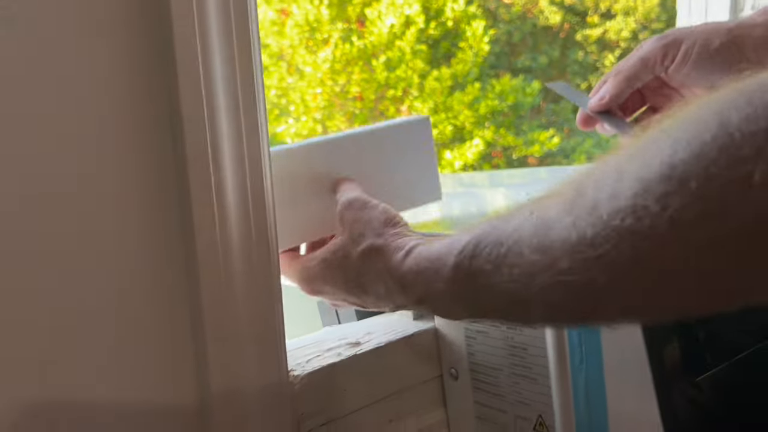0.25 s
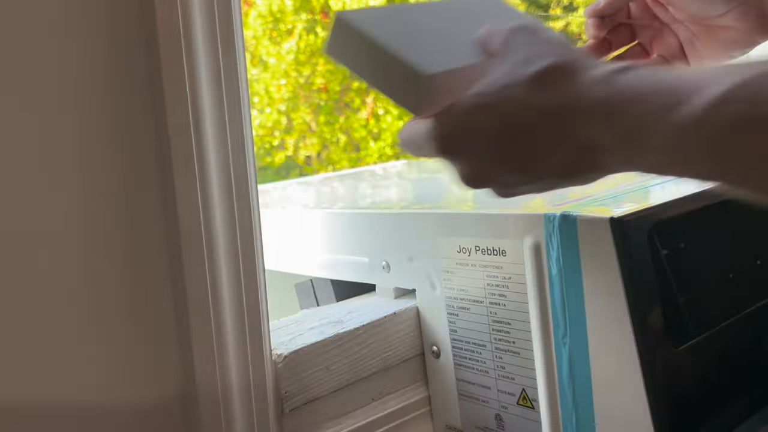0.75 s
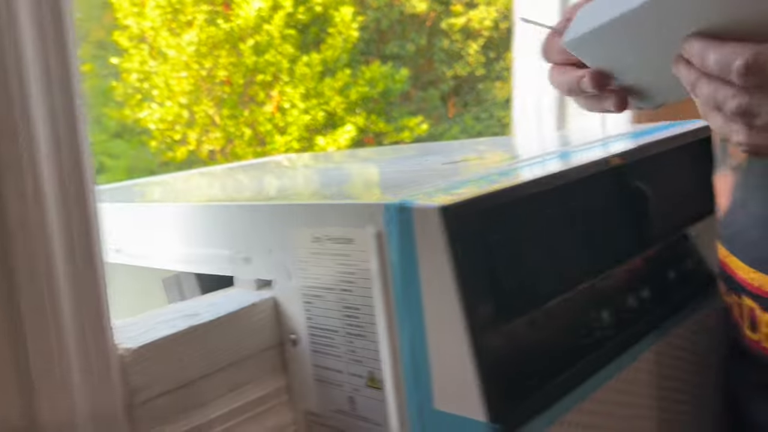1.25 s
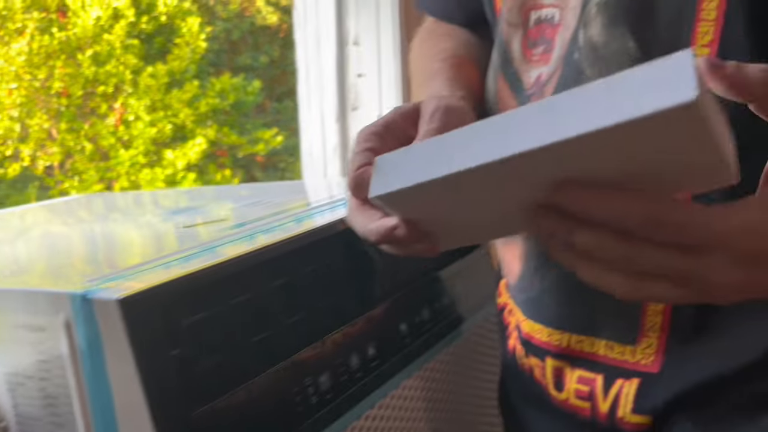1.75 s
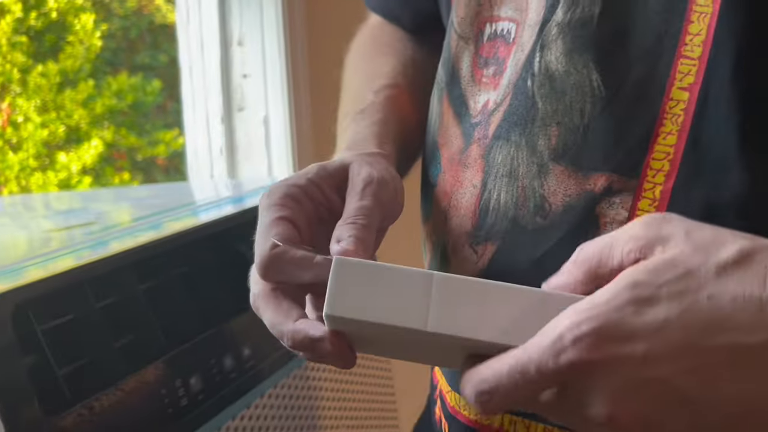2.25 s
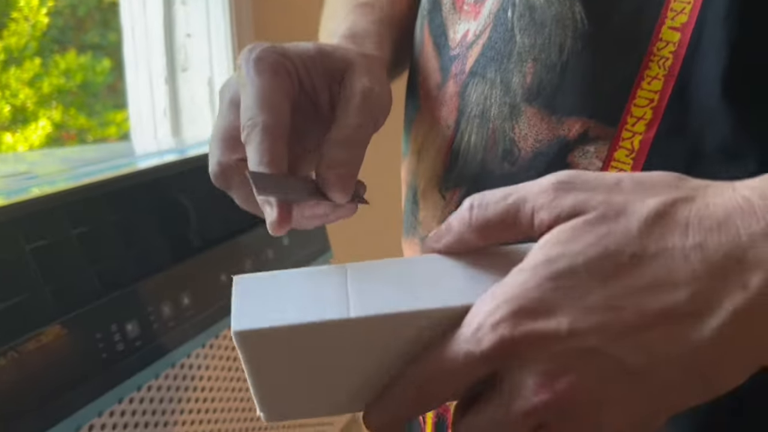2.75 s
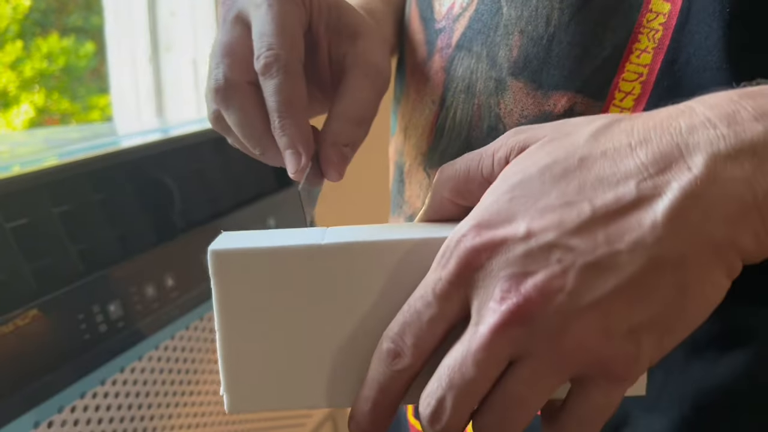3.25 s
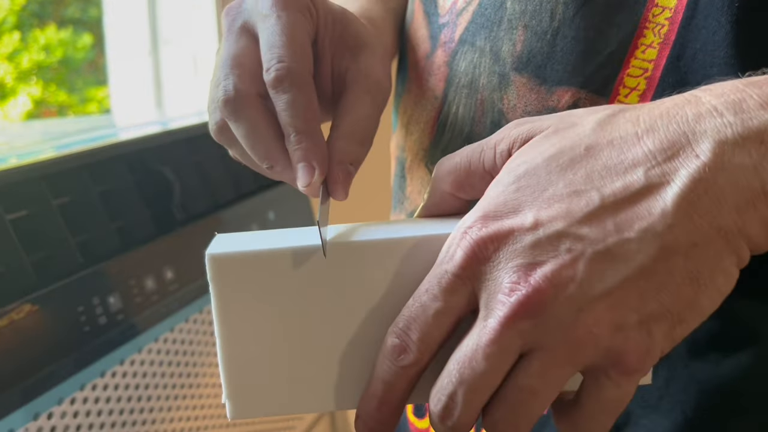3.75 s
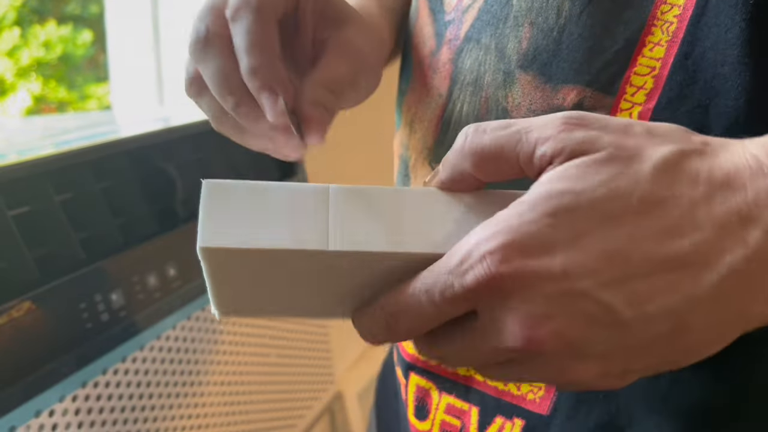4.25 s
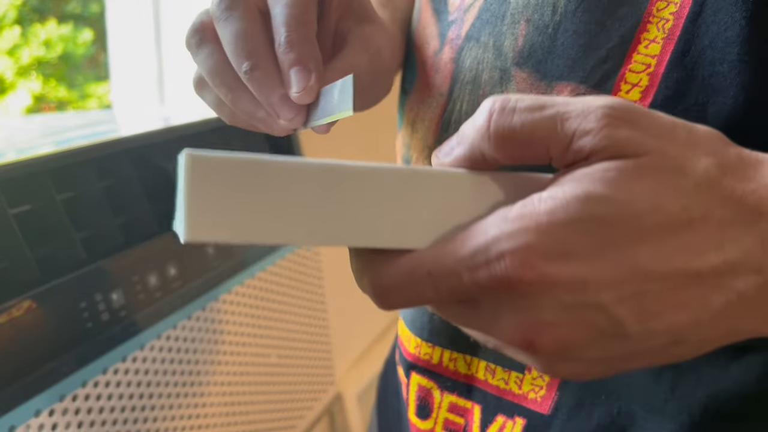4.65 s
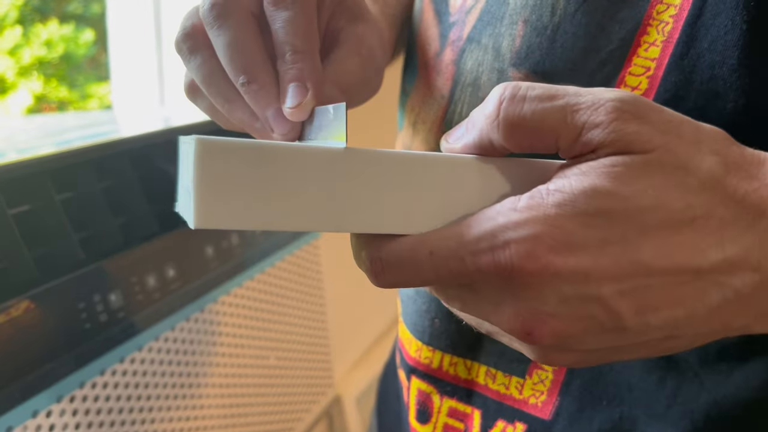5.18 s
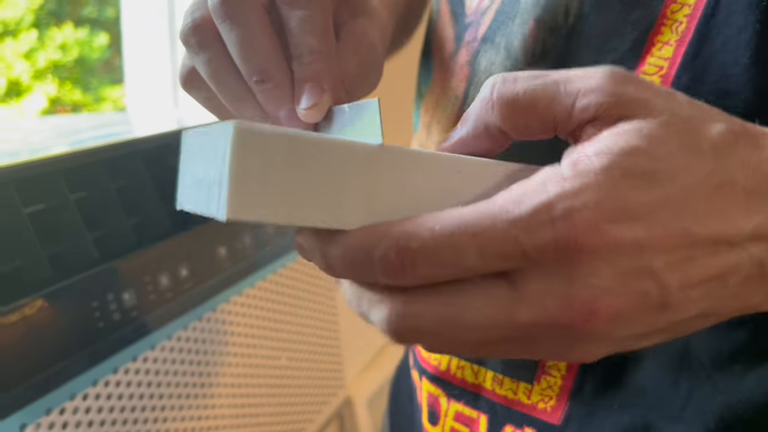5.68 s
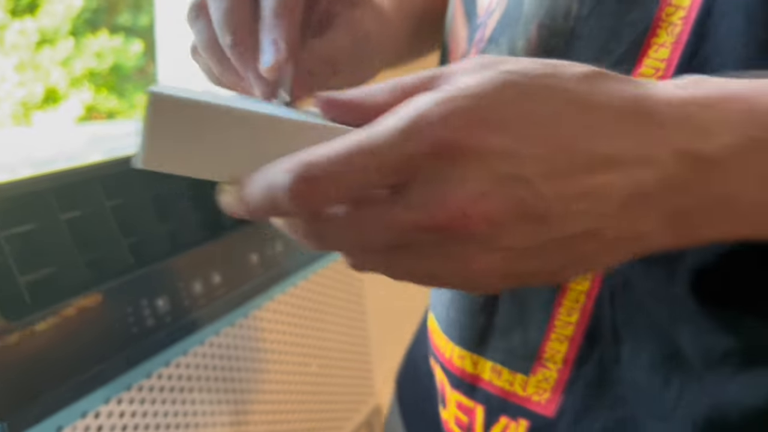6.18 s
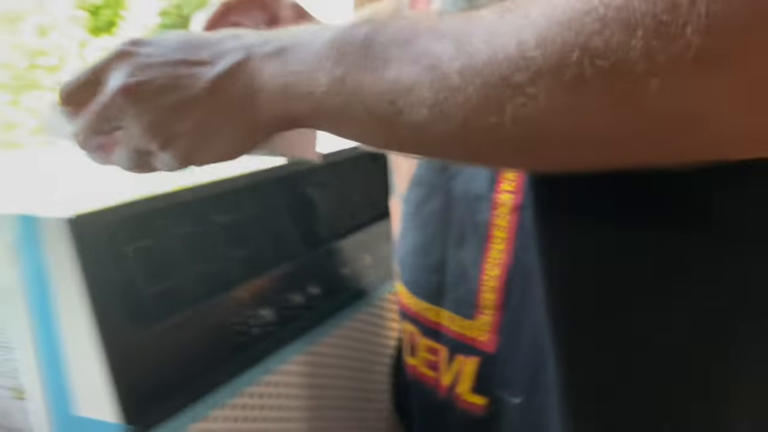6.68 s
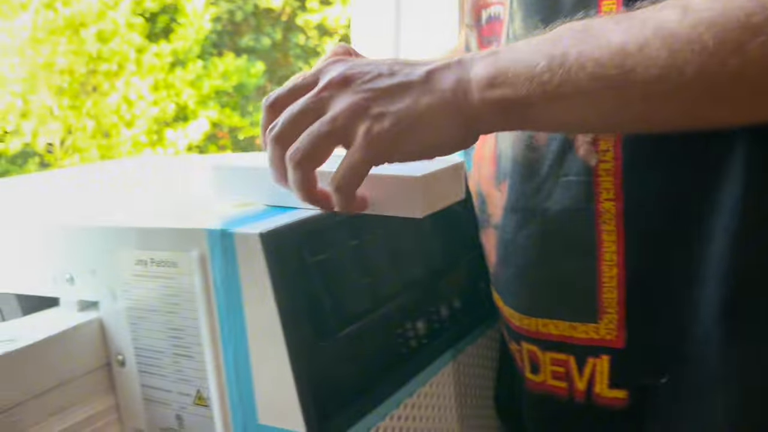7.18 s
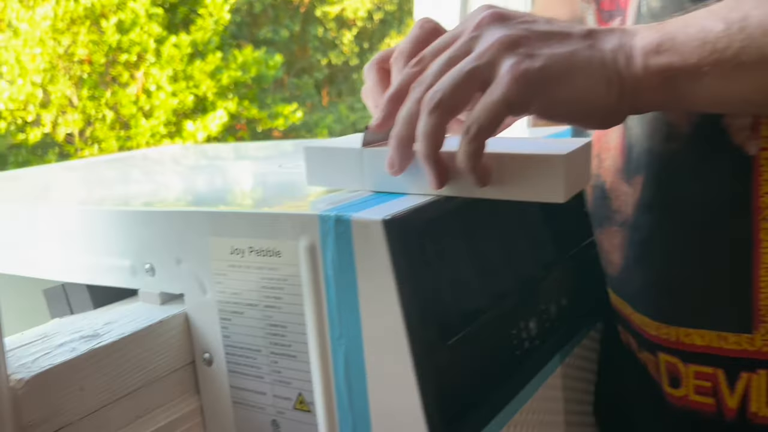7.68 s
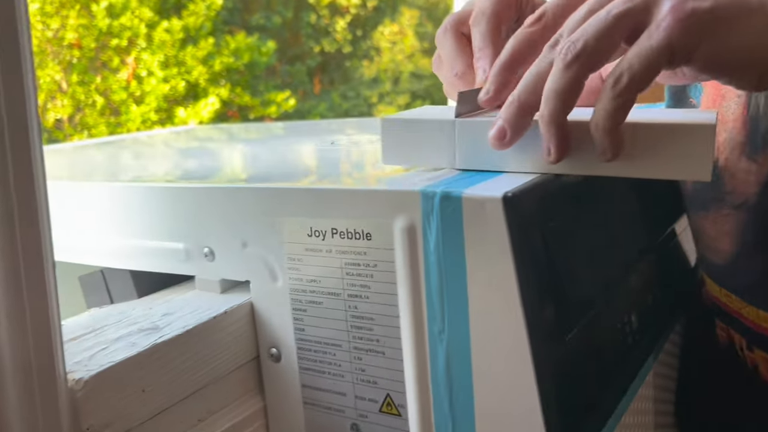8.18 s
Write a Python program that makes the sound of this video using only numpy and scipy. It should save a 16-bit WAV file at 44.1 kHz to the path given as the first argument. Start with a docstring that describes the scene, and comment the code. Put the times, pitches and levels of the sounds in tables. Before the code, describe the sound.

Stiff foam block rubbed and tapped in hands, knocked down onto a sheet-metal cabinet, then a blade ticks and squeaks over traffic and motor hum.

```python
"""Stiff foam block by an open window

Hands turn and rub a block of stiff foam, set it down on a sheet-metal cabinet and cut at it with a thin blade.
Rubbing is gritty shaped noise; taps and landings ring tuned modes under noisy cracks; the blade ticks and squeaks.
Traffic noise, a motor's wavering hum and faint whines lie behind, as a close two-port microphone hears them.
Levels in dB are mixing levels, set ahead of the peak rounding in record()."""
import sys
import numpy as np
from scipy import signal
from scipy.fft import rfft, irfft, next_fast_len
from scipy.io import wavfile

SR = 44100
rng = np.random.default_rng(int(sys.argv[2]) if len(sys.argv) > 2 else 0)


def transcribe(u):
    """Save the signal u as a 16-bit wav file named by the first command-line argument.

    u: samples, shape (n,) or (channels, n), limited to [-1, 1]; the rate is SR.
    q: integer samples, one column per channel.
    """
    v = np.clip(np.atleast_2d(u).T, -1, 1)
    q = np.round(v * 32767).astype(np.int16)
    wavfile.write(sys.argv[1], SR, q)


N = 371763


def from_db(db):
    """Decibels to gain."""
    return 10 ** (np.asarray(db) / 20)


def rms_one(x):
    """Scale to unit rms."""
    return x / np.sqrt(np.mean(x ** 2) + 1e-20)


def in_time(rows):
    """Columns of a curve table, one value per sample."""
    s, *columns = np.transpose(rows)
    return [np.interp(np.arange(N) / SR, s, column) for column in columns]


def drift(rate):
    """Slow random curve of spread 1, changing about rate times a second."""
    step = 40   # the curve is drawn once every 40 samples, then joined up
    r = np.exp(-2 * np.pi * rate * step / SR)
    white = rng.standard_normal(N // step + 2002)
    slow = signal.lfilter([1], [1, -2 * r, r * r], white)[2000:]
    return np.interp(np.arange(N) / step, np.arange(len(slow)), rms_one(slow))


def coloured(source, spectrum, turn=1):
    """Give a noisy source a spectrum, and a phase turn if asked; rms 1."""
    size = next_fast_len(N)
    hz = np.arange(size // 2 + 1) * SR / size + 1e-3
    point_hz, point_db = np.transpose(spectrum)
    gain = from_db(np.interp(np.log(hz), np.log(point_hz), point_db))
    return rms_one(irfft(rfft(source, size) * gain * turn, size)[:N])


def gritty(grit_db, rate):
    """White noise whose strength flickers at random."""
    return rng.standard_normal(N) * from_db(grit_db * drift(rate))


def ring(clicks, hz, t60):
    """A damped resonator: a unit click sets a sine of height 1 ringing."""
    r, w = from_db(-60 / (t60 * SR)), 2 * np.pi * hz / SR
    return signal.lfilter([0, np.sin(w)], [1, -2 * r * np.cos(w), r * r], clicks + 1e-18)


def tone(hz, db):
    """A sine of the given rms level on a moving pitch."""
    phase = 2 * np.pi * (np.cumsum(hz) / SR + rng.random())
    return np.sqrt(2) * from_db(db) * np.sin(phase)


def ports(source, other, mid, side, side_db, diffuse):
    """Two spaced ports: their difference is a quarter turn off their sum, plus a diffuse share."""
    diffuse = np.clip(diffuse, 0, 1)
    mixed = np.sqrt(1 - diffuse) * source + np.sqrt(diffuse) * other
    apart = coloured(mixed, side, turn=1j)
    return coloured(source, mid) + from_db(side_db) * apart * [[1], [-1]]


# Gain curve of the rubbing above 10 kHz. Each row: time in seconds, gain in dB.
TOP_GAIN = [(0, 1), (.4, -2), (.9, 1.5), (1.2, -1.5), (1.5, 0.5), (1.8, -1), (2.1, -1), (2.27, -3.5),
            (2.38, 0.5), (2.45, -2), (2.7, 2), (3.2, -1.5), (3.7, -4), (4.15, -1.5), (4.4, -4), (5.0, -3.5),
            (5.27, -3), (5.48, 3), (5.58, 2.5), (5.66, -2), (5.77, 0), (5.93, 0.5), (6.2, -2.5),
            (6.75, -0.5), (7.1, -2), (7.7, -3), (8.12, -3), (8.43, -2)]
# Edges in Hz of the neighbouring bands that brighten and dull separately.
PATCH_EDGES = [900, 1900, 2600, 3400, 4400, 5800, 7800, 10000, 16500]
PATCHES_PER_S = 14


def patchy(x, patchy_db):
    """Each band brightens and dulls on its own, as the contact shifts."""
    top_db, = in_time(TOP_GAIN)
    out = 0
    for low, high in zip(PATCH_EDGES, PATCH_EDGES[1:]):
        band = signal.sosfilt(signal.butter(2, [low, high], "band", fs=SR, output="sos"), x)
        gain_db = patchy_db * drift(PATCHES_PER_S) + top_db * (low >= 10000)
        out = out + from_db(gain_db) * band
    return out


# Strokes of skin or blade on foam. Each row: start in seconds, length in seconds, hiss level in dB,
# firmer scrape level in dB, scrape colour in Hz.
STROKES = [(0.247, 0.04, -67, -52, 2600), (0.349, 0.11, -49.5, -46.5, 2580), (0.466, 0.075, -53, -63, 2650),
           (0.581, 0.035, -61, -67, 2500), (0.924, 0.041, -57, -70, 2300), (1.07, .10, -56, -69, 2300),
           (1.183, 0.1, -45, -56, 1980), (1.343, 0.059, -45, -55, 1900), (1.46, 0.11, -51, -52.5, 1695),
           (1.598, 0.049, -47.5, -53, 1760), (1.686, 0.028, -50.5, -54, 1774),
           (1.746, .14, -47, -54.5, 1750), (1.953, 0.08, -48.5, -58, 4000), (2.06, 0.18, -55, -60, 1750),
           (2.244, 0.064, -43.5, -47, 3640), (2.336, 0.065, -43.5, -50, 3640),
           (2.432, 0.021, -47.5, -49, 3770), (2.562, 0.26, -54, -53.5, 2850), (2.97, 0.032, -62, -61, 2300),
           (4.098, 0.12, -52.5, -56, 3400), (4.272, 0.2, -51.5, -50, 3000), (5.21, 0.093, -49, -59, 4016),
           (5.332, 0.05, -49, -53, 3326), (5.447, .01, -44, -54, 2997), (5.462, 0.023, -34.5, -39.5, 3000),
           (5.492, 0.022, -35.5, -43.5, 2262), (5.568, 0.036, -37, -41.5, 2480),
           (5.612, 0.029, -38.5, -57, 4020), (5.658, 0.031, -39, -52, 3000),
           (5.699, 0.029, -40.5, -51, 2300), (5.75, 0.042, -45.5, -70, 2400), (5.86, 0.032, -55, -68, 2300),
           (5.898, 0.067, -50.5, -82, 2303), (6.167, 0.13, -49, -60, 2404), (6.727, 0.038, -41, -57, 2396),
           (7.091, 0.037, -47, -54, 2410), (8.103, 0.033, -48, -57, 4293), (8.199, 0.088, -58, -57, 4100)]
# Faint rustle between the strokes. Each row: time in seconds, hiss level in dB, scrape level in dB.
RUSTLE = [(0.0, -73, -51), (.3, -59, -59.5), (.85, -62, -52.5), (1.2, -52.5, -56), (2.5, -60.5, -56),
          (2.9, -73, -59), (3.3, -65, -56), (4.05, -56, -53.5), (4.6, -56, -49.5), (5.15, -58.5, -53),
          (6.1, -56.5, -49), (6.65, -57, -47), (6.9, -58.5, -53), (7.45, -59, -50), (8.0, -58, -53.5),
          (8.43, -53.5, -49)]
RISE_DB_PER_S, FALL_DB_PER_S = 796, 703   # how fast a stroke comes and goes
COLOUR_WIDTH, COLOUR_DB = 0.23, 8   # scrape resonance: width as a share of its pitch, level mixed in


def strokes(hiss, scrape):
    """Each stroke swells, holds and fades over the rustle, its scrape coloured by its own resonance."""
    t = np.arange(N) / SR
    hiss_db, scrape_db = in_time(RUSTLE)
    hiss_power = from_db(hiss_db) ** 2
    scraped = from_db(scrape_db) * scrape
    for start, length, stroke_hiss_db, stroke_scrape_db, hz in STROKES:
        near = slice(max(int((start - .15) * SR), 0), int((start + length + .15) * SR))
        before, after = np.maximum(start - t[near], 0), np.maximum(t[near] - start - length, 0)
        gain = from_db(-RISE_DB_PER_S * before - FALL_DB_PER_S * after)
        hiss_power[near] += (from_db(stroke_hiss_db) * gain) ** 2
        peak = signal.lfilter(*signal.iirpeak(hz, 1 / COLOUR_WIDTH, SR), scrape[:, near])
        tinted = rms_one(scrape[:, near] + from_db(COLOUR_DB) * peak)
        scraped[:, near] += from_db(stroke_scrape_db) * gain * tinted
    return np.sqrt(hiss_power) * hiss + scraped


# Treble hiss, sum of the ports, then their difference. Each row: frequency in Hz, relative density in dB.
HISS = [(2060, -38), (3500, 2.5), (4840, 3), (5660, 2), (6960, 3.5), (7700, 6), (9050, -8.5), (9580, -80),
        (9880, -48), (10100, -39), (10700, -6.5), (11700, -2), (13200, -5.5), (14700, -2.5), (15500, -12),
        (15800, -29)]
HISS_SIDE = [(2060, -36), (3500, -5), (6030, -1), (6750, -22), (6960, -84), (7320, -18), (7890, -12),
             (10000, 4.5), (11200, -6), (11900, -12), (12800, -21), (14000, -5), (15600, -21)]
# Firmer scrape, both sum and difference. Each row: frequency in Hz, relative density in dB.
SCRAPE = [(800, -30), (1550, -1.5), (2300, 4), (3200, 1.5), (4500, -2), (6500, -15), (9000, -57)]


def rubbing():
    """Light strokes hiss in the treble, firm ones add a lower scrape; both share the same grit."""
    grit = from_db(1.0 * drift(60))
    pressure = from_db(1.42 * drift(9.0))
    hiss = ports(gritty(0.33, 200), gritty(1.5, 200), HISS, HISS_SIDE, side_db=-2.5, diffuse=.3)
    scrape = ports(gritty(0.25, 100), gritty(1.5, 100), SCRAPE, SCRAPE, side_db=-8.5, diffuse=.3)
    hiss = rms_one(patchy(hiss, patchy_db=0.7))
    scrape = rms_one(patchy(scrape, patchy_db=1.23))
    return grit * pressure * strokes(hiss, scrape)


# The blade catches. Each row: time in seconds, relative peak level in dB, ring pitch in Hz.
TICKS = [(7.958, -38, 2820), (7.97, -33, 5930), (7.985, -41, 5300), (8.086, -48, 6000), (8.104, -39, 5260),
         (8.112, -45, 7400), (8.126, -45, 3800), (8.153, -41, 4100), (8.185, -46, 3900), (8.230, -38, 4100),
         (8.240, -50, 6000), (8.272, -46, 4000), (8.38, -49, 4200), (8.409, -40, 3717)]
TICK_S, TICK_T60_S = 0.0057, 0.013   # the scratch falls to 1/e in this time; the blade's ring to -60 dB


def ticks():
    """The thin blade catches on the foam: a dry scratch coloured by a short ring."""
    out, t = np.zeros(N), np.arange(1500) / SR
    for s, db, hz in TICKS:
        scratch = ring(rng.standard_normal(1500) * np.exp(-t / TICK_S), hz, TICK_T60_S)
        scratch = scratch / np.abs(scratch).max()
        at = int(s * SR)
        out[at:at + 1500] += from_db(db - 1.5) * scratch[:N - at]
    return out * from_db([[1.0], [-1.0]])   # a little to the left


# Blade squeak. Each row: time in seconds, level in dB, pitch in Hz.
SQUEAK = [(7.55, -70, 2743), (7.7, -60, 2746), (7.93, -58.5, 2720), (8.0, -51, 2596), (8.06, -60, 2560),
          (8.09, -50, 2550), (8.2, -52, 2577), (8.24, -47, 2550), (8.29, -47, 2530), (8.34, -53.5, 2556),
          (8.41, -47, 2518), (8.43, -51, 2520)]
SLIPS_PER_S, SLIP_DEPTH_DB, SQUEAK_WAVER_HZ = 120, 4, 129.9


def squeak():
    """The blade drags through the foam: a wavering high tone that throbs with each slip."""
    db, hz = in_time(SQUEAK)
    slip_rate = SLIPS_PER_S * (1 + 0.348 * drift(24))
    slips = np.sin(2 * np.pi * np.cumsum(slip_rate) / SR)
    hz = hz + SQUEAK_WAVER_HZ * drift(151.6)
    db = db + SLIP_DEPTH_DB * slips + 2.7 * drift(40)
    started = np.arange(N) > SQUEAK[0][0] * SR
    return tone(hz, db) * started


def dying_noise(at, db, spectrum, decay_s):
    """Coloured noise that starts at once at each blow and falls to 1/e in decay_s."""
    clicks = np.zeros(N)
    clicks[at] = from_db(db)
    dying = signal.lfilter([1], [1, -np.exp(-1 / (decay_s * SR))], clicks + 1e-18)
    return dying * coloured(rng.standard_normal(N), spectrum)


# Bright crack, then rough tail of a blow. Each row: frequency in Hz, relative density in dB.
CRACK = [(700, 0.5), (1500, 3.5), (2500, -2), (3800, -2), (5000, -7), (8000, -10), (9300, -23),
         (10100, -47), (11000, -19), (12500, -17.5), (15000, -18)]
TAIL = [(120, -37), (250, 10.5), (500, 1), (800, 0), (1500, -8.5), (3000, -22.5), (6000, -29), (9000, -54)]
CRACK_SPLIT_HZ = 2950   # the crack's treble is levelled separately above here
LOWS_LAG_CYCLES = 0.571   # a struck body's low modes speak later


def blows(events, modes, spread_db, crack_s, tail_s):
    """Each blow rings the modes, the high ones more if it is hard, with a bright crack and a rough tail."""
    s, crack_db, lift_db, body_db, brightness, tail_db = np.transpose(events)
    at, body = np.round(s * SR).astype(int), np.zeros(N)
    luck = rng.standard_normal((len(at), len(modes)))
    for k, (hz, db, t60) in enumerate(modes):
        clicks = np.zeros(N)
        strength_db = body_db + db + brightness * np.log2(hz / 500) + spread_db * luck[:, k]
        # neighbouring modes start with opposite signs
        clicks[at + int(LOWS_LAG_CYCLES * SR / hz)] = from_db(strength_db) * (-1) ** k
        body += ring(clicks, hz, t60)
    # foam contact lasts a fraction of a ms, which softens the ringing
    soft = signal.sosfilt(signal.butter(2, 3000, fs=SR, output="sos"), body)
    low, high = (signal.butter(2, CRACK_SPLIT_HZ, kind, fs=SR, output="sos") for kind in ("low", "high"))
    crack = signal.sosfilt(low, dying_noise(at, crack_db - 6.5, CRACK, crack_s))
    crack = crack + signal.sosfilt(high, dying_noise(at, crack_db - 7.5 + lift_db, CRACK, crack_s))
    return soft + crack + dying_noise(at, tail_db, TAIL, tail_s)


# Taps on the foam block. Each row: time in seconds, crack in relative dB, crack's treble lift in dB,
# body in relative dB, brightness in dB per octave, rough tail in relative dB.
TAPS = [(0.7192, -11.5, 0.5, -3.5, 0, -23), (0.7245, -23, -3, -23, 2, -38),
        (1.4084, -43, -5, -24, -6.5, -35.5), (1.9957, -28.5, -2, -18.5, -1, -35),
        (2.046, -50, 0, -33, -6, -39), (2.2063, -19, -6, -23.5, 0, -26.5), (2.226, -38, -10, -35, -2, -41),
        (2.247, -42, -5, -34, 4, -49), (5.937, -48, 6, -55, 0, -55), (5.973, -49, 3, -34, -4, -36),
        (6.0695, -38, -3, -31.5, 10, -39), (6.0735, -43, -3, -28, -9.5, -33),
        (7.0677, -32, 2, -28.5, 10, -43), (7.0757, -16, 2.5, -17.5, 8.5, -24.5),
        (7.083, -36, 0, -22.5, -10, -51), (7.969, -24.5, -7, -49, -11, -51), (8.103, -33, 7, -37, -1, -51),
        (8.1492, -34, 1, -46.5, -9, -53), (8.2346, -31, -3, -46, -5, -50)]
# Modes of the block. Each row: pitch in Hz, relative level in dB, time to fall 60 dB in seconds.
FOAM_MODES = [(168.7, -8.5, 0.05), (205, -2, 0.04), (260, -5.5, 0.035), (385, -9, 0.062), (587, 4, 0.015),
              (683, 3.5, 0.02), (1000, -11, 0.0094), (1264, -10.5, 0.013), (2220, -28, 0.017),
              (3340, -26, 0.0055)]


def foam_taps():
    """Taps set the light foam block ringing in short, well-damped modes."""
    return blows(TAPS, FOAM_MODES, spread_db=0.4, crack_s=0.0031, tail_s=0.03)


# The block lands and bounces. Each row: time in seconds, crack in relative dB, crack's treble lift in dB,
# body in relative dB, brightness in dB per octave, rough tail in relative dB.
LANDINGS = [(6.735, -28, 2, -37, -5, -26.5), (6.743, -27, 8, -20.5, -18.5, -30),
            (6.7855, -5, 3.5, -16.5, 8, -17), (6.7885, -9, 7, -22, 2, -27), (6.791, -18, -2, -8, -2, -18.5),
            (6.812, -33, -4, -26, 4, -37), (6.824, -36, -4, -20.5, 3, -39), (6.834, -43, 0, -23, -9, -45),
            (6.85, -48, 0, -26, -2, -44), (6.877, -50, 0, -23.5, -4, -52), (6.905, -50, -2, -29.5, -9, -55)]
# Modes of the cabinet. Each row: pitch in Hz, relative level in dB, time to fall 60 dB in seconds.
CABINET_MODES = [(265.8, 0.5, 0.089), (290, -5.5, 0.046), (339, -16, 0.2), (390.4, -9, .1),
                 (437.6, -1, 0.05), (474, 0.5, 0.12), (532, -6.5, 0.16), (610, -4.5, 0.072),
                 (730, -25, 0.023), (770, -1.5, 0.034), (883, -15, 0.11), (1091, -15, 0.054),
                 (1446, -14, 0.045), (1700, -16, 0.035), (2010, -15.5, 0.034)]


def cabinet_landing():
    """The block lands and bounces on sheet metal, whose modes ring at each contact."""
    return blows(LANDINGS, CABINET_MODES, spread_db=1.5, crack_s=0.0025, tail_s=0.025)


PORT_HZ, SHADOW_HZ = 1300, 1200   # the ports differ most here; knocks lean right here


def at_ports(knocks):
    """Off-axis knocks reach one port a little early: the difference is their slope."""
    apart = from_db(-3.5) * signal.lfilter([1, -1], [1, -.7], knocks) / 2
    port_peak = signal.lfilter(*signal.iirpeak(PORT_HZ, 1.5, SR), apart)
    shadow = signal.lfilter(*signal.iirpeak(SHADOW_HZ, 1.6, SR), knocks)
    apart = apart + from_db(4) * port_peak - from_db(-20) * shadow
    return knocks * from_db([[-.3], [.3]]) + apart * [[1], [-1]]


LOWS_T60_S = 0.32 / 4.5   # reverberation time at the very bottom
DULLING_HZ = 18000   # decay in dB is twice as fast here


def room(x):
    """Fourteen feedback delays a side, duller on every round."""
    size = next_fast_len(N + SR)
    hz = np.arange(size // 2 + 1) * SR / size
    out = np.zeros((2, len(hz)), complex)
    for k, lag in enumerate(rng.uniform(0.0054, 0.028, size=28)):
        loss_db = -60 * lag / LOWS_T60_S * (1 + hz / DULLING_HZ)
        echo = from_db(loss_db) * np.exp(-2j * np.pi * hz * lag)
        out[k % 2] += echo / (1 - echo) * (-1) ** (k // 2)
    return irfft(out * rfft(x, size), size)[:, :N]


# Traffic. Each row: time in seconds, rumble level in dB, roar level in dB, passing tyres level in dB.
TRAFFIC = [(0.0, -32.5, -38, -35.5), (0.6, -32.5, -39.5, -40), (0.94, -34.5, -38.5, -44),
           (1.15, -38.5, -38, -41.5), (1.8, -37.5, -39, -47.5), (2.4, -36, -40.5, -46.5),
           (3.1, -43, -40, -52.5), (3.75, -37.5, -40.5, -51), (4.8, -37.5, -42.5, -57.5),
           (5.45, -37.5, -40.5, -49), (5.8, -40.5, -42, -59), (6.4, -35, -40, -53),
           (7.4, -40, -40.5, -50.5), (7.85, -38, -39.5, -47), (8.43, -32, -39.5, -44.5)]
# Low rumble, then tyre noise. Each row: frequency in Hz, relative density in dB.
RUMBLE = [(13, -38), (24, -9), (42, -9), (60, -2), (80, 7), (119, -3.5), (161, -12), (215, -6), (252, -20),
          (325, -4), (400, -22.5), (520, -58), (880, -120)]
TYRES = [(250, -20), (450, 5), (650, 6.5), (850, 5), (1200, -1.5), (2000, -62)]
# Roar, sum of the ports, then their difference. Each row: frequency in Hz, relative density in dB.
ROAR = [(71, -22), (120, -1), (250, -11), (319, -7.5), (704, -19), (936, -15.5), (2070, -22), (5380, -41),
        (7450, -39), (8770, -50), (9510, -102), (11400, -66), (13200, -52), (14600, -69), (15500, -83)]
ROAR_SIDE = [(24, -36), (40, -3), (96, 2.5), (253, -11.5), (1410, -5.5), (2160, -26.5), (2920, -20),
             (6010, -44), (6640, -58), (7710, -82), (8310, -45), (9410, -33), (11500, -46), (12400, -71),
             (15500, -42)]


def traffic():
    """Shaped noises: low rumble, a broad roar, and tyre noise of passing cars."""
    rumble_db, roar_db, tyres_db = in_time(TRAFFIC)
    rumble = from_db(rumble_db + 0.5 * drift(4.8)) * coloured(rng.standard_normal(N), RUMBLE)
    roar = ports(gritty(0.96, 11.0), gritty(0.66, 9.6), ROAR, ROAR_SIDE, side_db=-2.5, diffuse=0.51)
    roar = from_db(roar_db) * roar * from_db([[.8], [-.8]])
    tyres = ports(gritty(2.1, 7.7), gritty(1.4, 10), TYRES, TYRES, side_db=-11.0, diffuse=.5)
    return rumble + roar + from_db(tyres_db) * tyres


# Motor. Each row: time in seconds, pitch in Hz, then fundamental, 2nd and 3rd partial levels in dB.
MOTOR = [(0.0, 108.3, -38, -39.5, -42.5), (0.65, 110, -40, -45, -39), (1.2, 106.2, -49, -47.5, -62),
         (2.0, 106.7, -41.5, -53, -47.5), (2.65, 105, -37, -64, -53), (2.86, 105.1, -47, -58, -37),
         (3.2, 103.5, -36, -53, -50), (3.5, 103.4, -33.5, -45, -49), (3.9, 103.5, -33.5, -47, -38.5),
         (4.15, 104.2, -38, -59, -43.5), (4.4, 104.1, -32, -55, -48.5), (4.8, 104.8, -33.5, -50, -43),
         (5.25, 104, -42.5, -49, -45), (5.5, 102.6, -33.5, -39, -61), (5.8, 103.7, -34.5, -41.5, -50),
         (5.97, 105.2, -45, -43.5, -45), (6.17, 103.2, -43, -41, -46), (6.35, 102.7, -34, -39.5, -43.5),
         (6.7, 102.6, -39.5, -40.5, -68), (7.1, 104.1, -37, -44.5, -41.5), (7.75, 103.4, -24.5, -49, -43.5),
         (8.0, 105, -29, -47, -58), (8.43, 105.4, -27.5, -50, -36)]
# Deep wavering hum. Each row: time in seconds, pitch in Hz, level in dB.
DEEP_HUM = [(0.0, 57, -31), (0.16, 56.4, -37), (0.35, 55.3, -30), (0.8, 57.7, -38), (1.05, 57, -33),
            (1.3, 55.6, -38.5), (2.7, 55.5, -34.5), (3.45, 55.45, -38), (3.61, 54.75, -27.5),
            (3.75, 54.07, -39), (4.55, 54.83, -42), (5.3, 54.7, -37), (5.6, 57, -41), (6.4, 56.9, -39),
            (6.6, 53.77, -40), (7.8, 54.44, -35), (8.43, 53.97, -30.5)]
MOTOR_SHIFT_S = .00009   # the motor comes this much early at the right port, as much late at the left


def hum():
    """Three motor partials and a deeper tone, all wavering."""
    hz, *levels = in_time(MOTOR)
    hz = hz + 0.12 * drift(2.66)
    motor = sum(tone((k + 1) * hz, db + 0.8 * drift(3.5)) for k, db in enumerate(levels))
    deep_hz, deep_db = in_time(DEEP_HUM)
    deep = tone(deep_hz + 0.88 * drift(3.3), deep_db + 3.0 * drift(9.4))
    # a small time shift is the slope times the shift
    shift = MOTOR_SHIFT_S * SR * np.gradient(motor) * [[-1], [1]]
    return (motor + deep) * from_db([[.2], [-.2]]) + shift


# Faint whines. Each row: start in seconds, end in seconds, pitch in Hz, width in Hz, level in dB.
WHINES = [(0.44, 0.66, 1520, 190, -46.5), (0.66, 1.09, 1520, 200, -44.5), (0.3, 1.1, 1060, 70, -44.5),
          (7, 7.45, 1900, 73, -54.5), (0.9, 2.06, 693, 66, -48.5), (1.5, 2.05, 2000, 76, -54),
          (0.1, 1.25, 1120, 390, -49), (2, 5.2, 995, 54, -56), (7.5, 8.6, 291, 3.4, -50),
          (1, 6.21, 89, 2.9, -51.5), (8, 8.8, 163, 3.2, -47.5), (6.5, 8.43, 82, 4.8, -35.5),
          (-1, 0.84, 83, 3.9, -36.5), (2, 10, 150, 3.1, -52), (4, 5.2, 420, 12, -55)]
WHINE_SIDE_DB = -19   # difference of the ports from 1 kHz up; less below


def whines():
    """Narrow bands of noise that swell and fade."""
    out, t = np.zeros((2, N)), np.arange(N) / SR
    for start, end, hz, width_hz, db in WHINES:
        band = signal.butter(2, [hz - width_hz / 2, hz + width_hz / 2], "band", fs=SR, output="sos")
        mid, side = rng.standard_normal((2, N))
        spread = from_db(WHINE_SIDE_DB) * min(hz / 1000, 1) * side * [[1], [-1]]
        whine = rms_one(signal.sosfilt(band, mid + spread))
        swell = np.clip(np.minimum(t - start, end + 0.11 - t) / 0.16, 0, 1)
        out += from_db(db + 1.2 * drift(7.4)) * swell * whine
    return out


def scene():
    """Near hands and block in the room, the street beyond."""
    knocks = foam_taps() + cabinet_landing()
    block = at_ports(knocks) + from_db(-10) * room(knocks)
    hands = rubbing() + ticks() + squeak()
    return block + hands + traffic() + hum() + whines()


def record(dry):
    """Peaks are rounded, the top is cut at 15.8 kHz."""
    rounded = 1.723 * np.tanh(dry / 1.876)
    return signal.sosfilt(signal.cheby2(12, 70, 15800, fs=SR, output="sos"), rounded)


dry = scene()
out = record(dry)
transcribe(out)
```